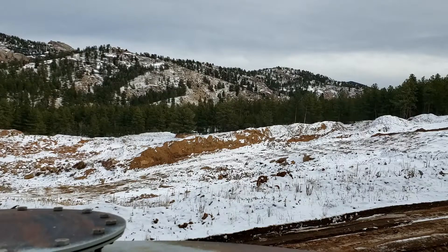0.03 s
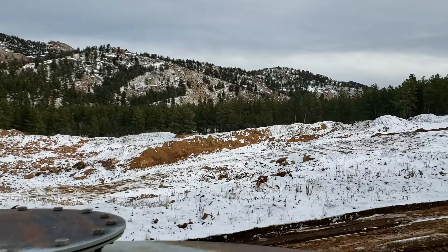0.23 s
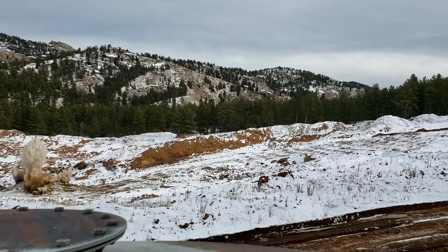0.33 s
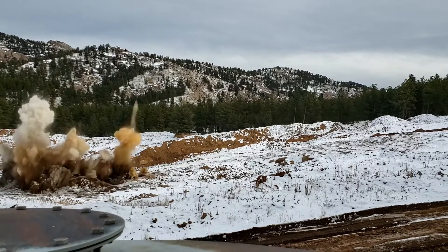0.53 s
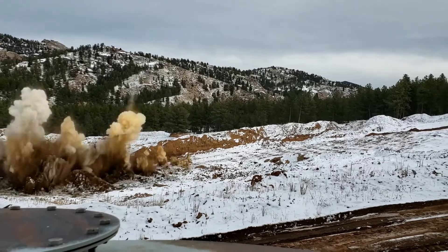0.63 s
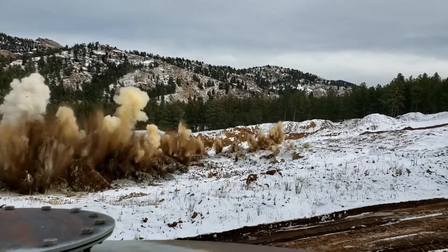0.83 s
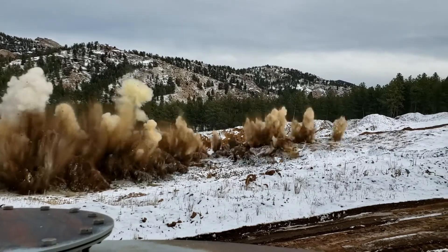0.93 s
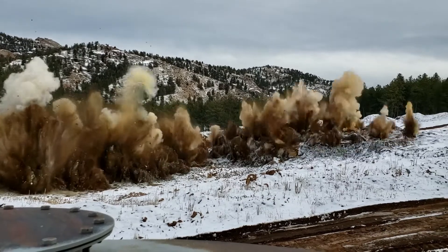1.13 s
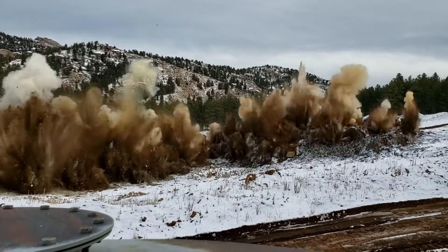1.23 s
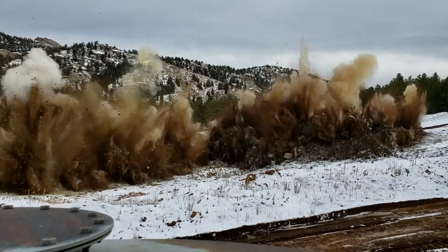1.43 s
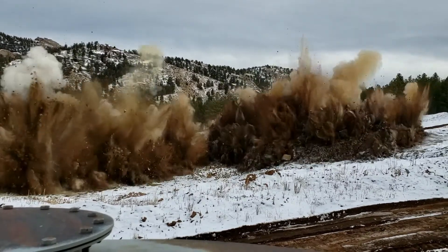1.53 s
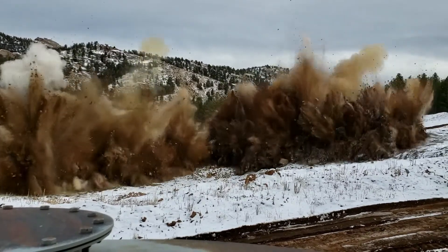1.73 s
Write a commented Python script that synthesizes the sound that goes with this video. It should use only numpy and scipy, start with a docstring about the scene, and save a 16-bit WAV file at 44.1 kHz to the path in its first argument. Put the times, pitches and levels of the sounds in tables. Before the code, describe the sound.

A quarry blast sounds across an open field. From 0.2 to 0.6 seconds, charges fire in a rapid string of sharp pops with rattling rock. A deep rumble swells from 0.4 seconds. At 0.8 seconds comes a sharp crack with a spray of grit, then weaker pops and a second crack at 1.3 seconds. The hills echo briefly and the rumble fades by 1.8 seconds, all duller on the left.

```python
"""Quarry blast across a snowy field, heard from beside a vehicle; duller at the left microphone.
From 0.2 s a row of charges fires in quick sequence, each a short N-shaped shock; broken rock sprays
and rattles. From 0.4 s the ground heaves with a deep rumble. At 0.83 s holes vent with a sharp crack
and a spray of grit; weaker shocks follow, and a second group vents at 1.33 s.
The wooded hills scatter the shocks and cracks back, and the rumble fades."""
import sys
import numpy as np
from scipy import signal
from scipy.fft import rfft, irfft
from scipy.io import wavfile
from scipy.ndimage import uniform_filter1d, map_coordinates

SR = 44100
rng = np.random.default_rng(int(sys.argv[2]) if len(sys.argv) > 2 else 0)


def int16_out(signal):
    """Quantize to a 16-bit WAV file."""
    q = np.round(np.clip(np.atleast_2d(signal).T, -1, 1) * 32767)
    wavfile.write(sys.argv[1], SR, q.astype(np.int16))


N = 79380

# holes venting into the air: start_s, level_db, overpressure_ms, spit_db
VENTS = [(0.8284, -0.5, 0.94, -16.5), (1.3278, -9.5, 2, -32), (1.331, -9.5, 0.94, -32),
         (1.3352, -4.5, 1.18, -19.5), (1.3405, -21.5, 6.2, -53)]


def undb(db):
    return 10 ** (np.asarray(db) / 20)


def unit(x):
    return x / np.sqrt(np.mean(x ** 2))


def colour(x, spectrum):
    """Filter by rows of freq_hz, gain_db."""
    hz, db = np.array(spectrum, float).T
    bins_hz = np.maximum(np.fft.rfftfreq(2 * N, 1 / SR), 1)
    gain = undb(np.interp(np.log(bins_hz), np.log(hz), db))
    return irfft(rfft(x, 2 * N) * gain)[..., :N]


def roll_off(x, hz, kind, order=1):
    """Gentle low-pass or high-pass."""
    return signal.sosfilt(signal.butter(order, hz, kind, fs=SR, output="sos"), x + 1e-18)


def walk(rate_hz):
    """Smooth random motion, unit RMS."""
    hold = int(SR / rate_hz)
    steps = np.repeat(rng.standard_normal(N // hold + 2), hold)
    return unit(uniform_filter1d(steps, hold)[:N])


def curves(table):
    """One per-sample curve for each column after time_s."""
    times_s, *columns = np.array(table, float).T
    return [np.interp(np.arange(N) / SR, times_s, column) for column in columns]


def spread(mid, side, width):
    """Left and right from two unrelated sounds."""
    return (mid + width * side * np.array([[1], [-1]])) / np.hypot(1, width)


def grains(rate_hz=1400, spread_db=4, click_share=0.44):
    """Dense clicks of very unequal size over a smooth rush."""
    clicks = (rng.random(N) < rate_hz / SR) * rng.choice([-1, 1], N)
    sizes = undb(spread_db * np.minimum(rng.exponential(size=N), 5))
    rush = rng.standard_normal(N)
    return np.sqrt(click_share) * unit(clicks * sizes) + np.sqrt(1 - click_share) * rush


def air(level_db=-70.5):
    """Faint, steady outdoor noise."""
    spectrum = [(25, -18), (55, 3), (120, -7.5), (400, -23), (1200, -20.5), (1900, -8.5), (2600, -22),
                (6000, -31), (14000, -47)]  # freq_hz, gain_db
    noise = spread(*rng.standard_normal((2, N)), width=0.43)
    return undb(level_db) * unit(colour(noise, spectrum))


def hills(blast, t, level_db=-16, t60_s=0.59, delay_s=0.012):
    """Rough ground and trees scatter each shock back as a diffuse tail."""
    noise = spread(*rng.standard_normal((2, N)), width=0.49)
    tail = unit(noise * undb(-60 * t / t60_s) * (t > delay_s)) / np.sqrt(N)
    return undb(level_db) * signal.fftconvolve(blast[None], tail, axes=1)[:, :N]


def grit(t, level_db=-38, swell_s=0.025):
    """Fine grit sprays from the first vent, swelling and fading."""
    age = np.maximum(t - VENTS[0][0], 0) / swell_s
    spray = spread(grains(), grains(), width=0.63)
    spray = unit(roll_off(spray, 6500, "high", order=2))
    return undb(level_db) * (age * np.exp(1 - age)) ** 2 * spray


def rock():
    """Breaking and flying rock: low body, rattle of stones, hiss of grit."""
    envelopes = [(.212, -92, -98, -100), (0.217, -33, -25.5, -55), (0.234, -35.5, -24, -29.5),
                 (.34, -34, -24, -34), (0.532, -44, -28.5, -40.5), (0.589, -25, -24.5, -30.5),
                 (0.642, -44.5, -38, -51), (0.742, -34, -39, -56), (0.824, -37.5, -45, -56),
                 (0.83, -23.5, -48, -33.5), (0.868, -28, -27.5, -32), (.95, -31.5, -31, -40.5),
                 (1.06, -39, -34, -44.5), (1.17, -36.5, -45, -60), (1.316, -41, -50, -64),
                 (1.333, -20.5, -36.5, -41), (1.377, -36, -39.5, -56), (1.539, -41.5, -49.5, -89),
                 (1.71, -47, -55.5, -69), (1.77, -42.5, -53.5, -81)]  # time_s, body_db, rattle_db, hiss_db
    # spectra: freq_hz, gain_db
    body = [(110, -8.5), (230, -2), (430, -6), (700, -13.5), (1400, -23), (4000, -75)]
    rattle = [(200, -36), (520, 4.5), (900, 1), (1500, 0), (2100, -7), (2800, -7.5), (4500, -19),
              (10000, -67)]
    hiss = [(1200, 1), (2800, -5), (4500, -6.5), (6500, -10), (8500, -18.5), (11000, -17), (14000, -18.5)]
    out = np.zeros((2, N))
    for level_db, spectrum, width in zip(curves(envelopes), (body, rattle, hiss), (0.25, 0.75, 0.71)):
        mid, side = (unit(colour(grains(), spectrum)) for _ in range(2))
        out += undb(level_db) * spread(mid, side, width)
    return out


def ground_rumble(wander=0.114, flutter_db=1.74, noise_db=-3.5):
    """The quarry bench sways at a wandering low pitch over rough noise."""
    envelope = [(.205, -91), (.22, -39), (.37, -43), (.41, -20), (.44, -14), (.55, -12.5), (.67, -12.5),
                (.715, -26.5), (.745, -13.5), (.80, -14.5), (.82, -32), (.92, -16), (1.0, -27.5),
                (1.06, -19), (1.09, -26.5), (1.25, -27), (1.37, -19), (1.43, -32), (1.64, -34.5),
                (1.70, -47), (1.74, -38.5), (1.8, -44)]  # time_s, level_db
    sway_pitch = [(.3, 68.06), (.43, 80.89), (.58, 84.14), (.75, 67.14), (1.05, 67.9), (1.8, 53.6)]  # highest while the charges fire: time_s, pitch_hz
    spectrum = [(18, -18), (35, -2.5), (60, -3.5), (95, 1), (140, -12.5), (220, -25.5), (1200, -93)]  # freq_hz, gain_db
    pitch_hz = curves(sway_pitch)[0] * np.exp(wander * walk(rate_hz=59.96))
    phase = 2 * np.pi * np.cumsum(pitch_hz) / SR
    sway = unit(np.sin(phase) * undb(flutter_db * walk(rate_hz=24.52)))
    mid, side = (unit(colour(rng.standard_normal(N), spectrum)) for _ in range(2))
    rough = undb(noise_db) * spread(mid, side, width=0.15)
    return unit(sway + rough) * undb(curves(envelope)[0])


def ground_heaves(t):
    """Each heave of the ground swells and dies within a few cycles."""
    heaves = [(0.2173, -19.5, 70.4, 0.004), (0.425, -5.5, 89, 0.0071), (0.528, -11.5, 117, 0.0085),
              (0.597, -2, 97, 0.013), (0.6295, -1.5, 52, 0.007), (.678, -22.5, 197, 0.0063),
              (0.829, -9, 144, 0.005), (.834, -3, 58.2, 0.011), (1.109, -15, 57.2, 0.009),
              (1.274, -16.5, 72.95, 0.0067), (1.338, -15.5, 53.4, 0.01)]  # start_s, level_db, pitch_hz, swell_s
    out = np.zeros(N)
    for start_s, level_db, pitch_hz, swell_s in heaves:
        age_s = np.maximum(t - start_s, 0)
        envelope = age_s / swell_s * np.exp(1 - age_s / swell_s)
        out += undb(level_db) * envelope * np.sin(2 * np.pi * pitch_hz * age_s)
    return out


def vent_puff(t, gain_db=5, scale_s=0.00057):
    """The first vent's wave sweeps the microphones: brief suction at the right, slower recovery."""
    age = np.maximum(t - VENTS[0][0], 0) / scale_s
    swing = age * (age / 3 - 1) * np.exp(1 - age / 1.14)
    return undb(gain_db) * swing * np.array([[0], [1]])


def vent_cracks(t, push_gain_db=2.5, rise_hz=6560, spit_decay_s=0.0017):
    """Venting holes: a steep front with a brief spit of gas, then a longer, shallow suction."""
    gas_spectrum = [(600, -6), (2500, -6.5), (4450, 12.5), (8000, -11), (14000, 0)]  # freq_hz, gain_db
    push, spit = np.zeros(N), np.zeros(N)
    for start_s, level_db, overpressure_ms, spit_db in VENTS:
        age_s = np.maximum(t - start_s, 0)
        progress = age_s * 1000 / overpressure_ms
        push += undb(level_db) * (1 - progress) * np.exp(-progress) * (t >= start_s)
        spit += undb(spit_db) * np.exp(-age_s / spit_decay_s) * (t >= start_s)
    gas = unit(colour(rng.standard_normal(N), gas_spectrum))
    return undb(push_gain_db) * roll_off(push, rise_hz, "low") + spit * gas


def charge_shocks(t, gain_db=-1, rise_hz=7400, low_cut_hz=157, scatter_db=-9.5, scatter_s=0.0012):
    """N-waves: pressure jumps, falls through zero, jumps back; air rounds it, near rubble smears it."""
    charges = [(0.2144, 1.5, 1.36, 2500), (.2159, -8, 0.58, 2200), (0.237, -15, 1.04, 2580),
               (0.2621, -1.5, 1.03, 2500), (0.2743, 0, 0.69, 2960), (0.2899, 5, 0.36, 3870),
               (0.3021, -0.5, 0.76, 3180), (0.3183, 4, 0.52, 2880), (0.3227, -2, 0.45, 3140),
               (0.3333, -0.5, 0.79, 4000), (0.339, 3, 0.58, 2800), (0.3484, -3, 0.68, 3000),
               (0.3553, -7.5, 0.69, 3200), (0.364, -6, 0.52, 2800), (0.3713, -4, 0.8, 2600),
               (0.377, 0, 0.66, 2780), (.3872, -2.5, 0.58, 3500), (0.3942, 2.5, 0.63, 1960),
               (0.4047, 1.5, 0.52, 3300), (0.4146, -1.5, 0.61, 3970), (0.427, 1, 0.68, 3300),
               (0.4356, -1.5, 0.48, 3300), (0.4419, -0.5, 0.68, 3800), (0.4573, -1.5, 0.39, 4520),
               (0.4668, -0.5, 0.61, 3300), (0.4883, -1.5, 0.62, 4500), (0.5003, -0.5, 0.66, 1900),
               (0.5041, -5, 0.64, 3500), (0.5228, -1, 0.6, 5800), (0.5344, -3, 0.33, 5000),
               (.555, 0, 0.77, 3930), (0.5652, -2.5, 0.67, 4500), (0.5678, 0.5, 0.27, 3900),
               (0.577, -2, 1.5, 2800), (0.584, -2.5, 1.31, 2400), (.589, -1.5, 1.42, 2180),
               (0.6098, -0.5, 1.14, 1410), (.630, -17.5, 0.41, 2800), (.663, -15, 0.54, 2840),
               (0.6956, -18, 0.57, 4500), (0.6994, -10, 0.56, 2210), (0.7279, -16.5, 0.42, 5200),
               (0.765, -18.5, 0.38, 5500), (0.7871, -11, 0.75, 3570), (0.7902, -12.5, 0.33, 4500),
               (0.815, -9.5, 0.41, 4500), (1.0558, -10, 0.79, 2430), (1.085, -16, 0.47, 4000),
               (1.0975, -12.5, 0.25, 5940), (1.125, -17.5, 0.23, 4500), (1.192, -12.5, 1.42, 2800),
               (1.2102, -20.5, 0.21, 7000), (1.242, -18, 1.3, 2870), (1.3179, -12, 0.98, 4000)]  # start_s, level_db, length_ms, front_cutoff_hz; the row at 0.2159 s is the first shock bouncing off the ground
    out = np.zeros(N)
    fade = np.exp(-t / scatter_s)
    for start_s, level_db, length_ms, front_cutoff_hz in charges:
        progress = (t - start_s) * 1000 / length_ms
        n_wave = (1 - 2 * progress) * ((progress >= 0) & (progress < 1))
        shock = undb(level_db) * roll_off(n_wave, front_cutoff_hz, "low")
        rubble = unit(rng.standard_normal(N) * fade) / np.sqrt(N)
        out += shock + undb(scatter_db) * signal.fftconvolve(shock, rubble)[:N]
    return undb(gain_db) * roll_off(roll_off(out, rise_hz, "low"), low_cut_hz, "high")


def scene():
    t = np.arange(N) / SR
    blast = charge_shocks(t) + vent_cracks(t)
    background = air() + hills(blast, t)
    ground = ground_rumble() + ground_heaves(t)
    return background + ground + rock() + grit(t) + vent_puff(t) + blast


def record(dry, top_hz=14700):
    """The left microphone is shaded; the recorder rounds the highest peaks and cuts the top."""
    left_lag = [(.45, -.00006), (1.1, .00016)]  # grows as the firing runs left to right: time_s, lag_s
    left_shade = [(300, -.5), (600, -0.5), (1000, -7.5), (1600, -11), (2600, -10.5), (4500, -16),
                  (8000, -18.5), (13000, -11)]  # freq_hz, gain_db
    left, right = dry
    lag_s = curves(left_lag)[0]
    left = map_coordinates(left, [np.arange(N) - lag_s * SR], mode="mirror")
    both = np.array([colour(left, left_shade), right])
    rounded = both / (1 + both ** 4) ** .25
    return signal.sosfilt(signal.ellip(8, .2, 70, top_hz, fs=SR, output="sos"), rounded)


dry = scene()
out = record(dry)
int16_out(out)
```